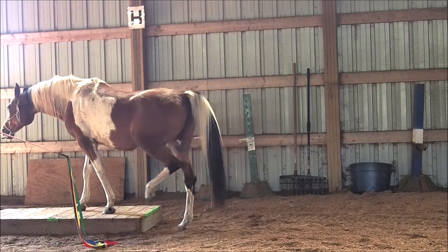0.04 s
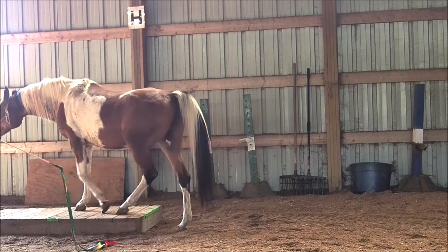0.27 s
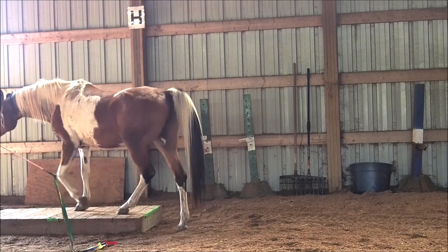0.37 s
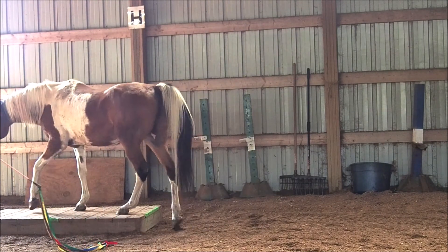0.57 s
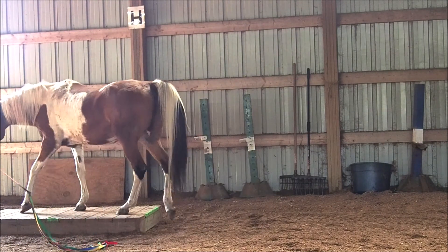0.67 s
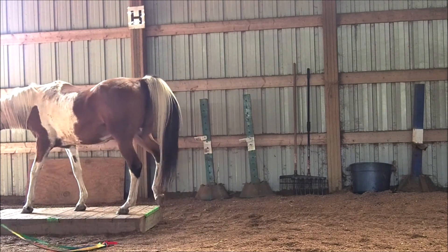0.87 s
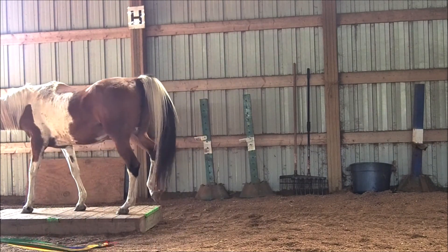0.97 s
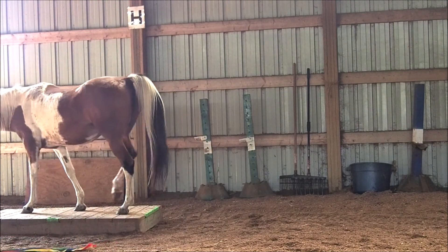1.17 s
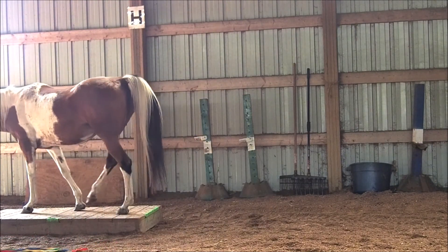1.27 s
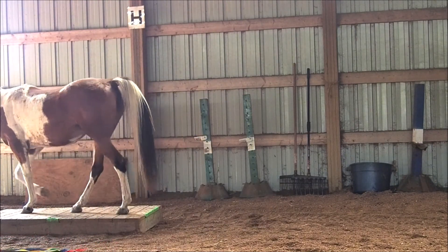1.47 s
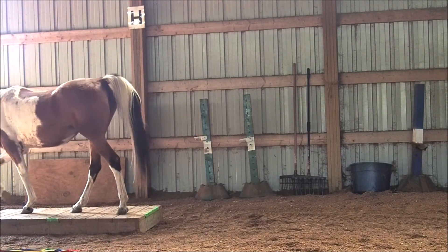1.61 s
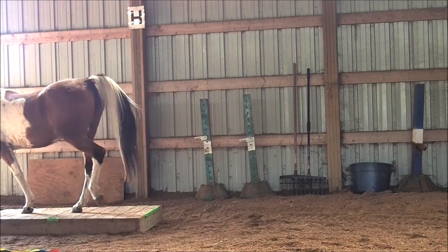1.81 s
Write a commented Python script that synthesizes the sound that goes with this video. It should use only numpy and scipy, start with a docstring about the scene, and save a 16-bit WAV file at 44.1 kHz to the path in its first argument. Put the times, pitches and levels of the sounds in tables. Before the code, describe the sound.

Hollow hoof steps on wooden boards, with soft sandy scuffs, echo in a big hall.

```python
"""A horse walks onto a low, hollow wooden platform in a large indoor riding arena, over steady rumble and
hiss. At 0.2 s a hoof lands toe first, then flat: the deck booms, boards clack, sand crunches, something
clinks faintly and the hall answers. A scuff leads to a softer step at 0.7 s and one faint, high chirp at
0.95 s. Hooves scuff again, grit snaps, a firm step lands at 1.4 s and a last scuff fades."""
import sys
import numpy as np
from scipy import signal
from scipy.fft import rfft, irfft
from scipy.io import wavfile
from scipy.ndimage import uniform_filter1d

SR = 44100
rng = np.random.default_rng(int(sys.argv[2]) if len(sys.argv) > 2 else 0)


def pcm_store(signal):
    """Save signal as 16-bit PCM."""
    levels = np.round(np.clip(np.atleast_2d(signal), -1, 1) * 32767)
    wavfile.write(sys.argv[1], SR, levels.astype(np.int16).T)


N = 81585
TIME_S = np.arange(N) / SR
BINS_HZ = np.fft.rfftfreq(N, 1 / SR)


def amp(db):
    """Decibels to gain."""
    return 10 ** (np.asarray(db) / 20)


def unit(x):
    """Scale to rms 1."""
    return x / np.sqrt(np.mean(x ** 2) + 1e-20)


def curve(points, hz=BINS_HZ):
    """Interpolate (Hz, value) rows over log frequency."""
    knots_hz, values = np.transpose(points)
    return np.interp(np.log(hz + 1), np.log(knots_hz + 1), values)


def add(mix, start_s, sound):
    """Mix a sound in at start_s."""
    part = mix[..., round(start_s * SR):][..., :sound.shape[-1]]
    part += sound[..., :part.shape[-1]]


def fade(age_s, t60_s):
    """Exponential decay, 60 dB down at t60_s."""
    return np.exp(-np.log(1000) * age_s / t60_s)


def low_cut(x, hz, order):
    """Butterworth high-pass."""
    return signal.sosfilt(signal.butter(order, hz, "high", fs=SR, output="sos"), x)


def tint(x, gain):
    """Filter by one gain per frequency bin."""
    return irfft(rfft(x) * gain, N)


def noise(gain=1, coherence=None):
    """Stereo noise, rms 1, of given spectrum and left-right coherence."""
    # Each row: frequency in Hz, coherence.
    default_coherence = [(30, 1), (500, 1), (1200, 1), (2500, 0.94), (5000, 0.95), (9000, 0.6)]
    left, independent = rfft(rng.standard_normal((2, N)))
    shared = curve(coherence or default_coherence)
    right = shared * left + np.sqrt(1 - shared ** 2) * independent
    return unit(irfft(np.array([left, right]) * gain, N))


def band(hz, width_hz):
    """Gaussian band of stereo noise."""
    return noise(np.exp(-.5 * ((BINS_HZ - hz) / width_hz) ** 2))


def background(flutter_hz=30, peak_s=.016):
    """Room air, microphone rumble and hiss; one high band flutters, mostly on the right."""
    # Each row: frequency in Hz, relative density in dB.
    air_spectrum = [(10, 3.5), (24, -2), (38, -4.5), (54, -17.5), (95, -18), (200, -21), (450, -20),
                    (850, -22), (1600, -25.5), (1950, -32.5), (3000, -34.5), (4100, -38.5), (5200, -25.5),
                    (6800, -28.5), (8000, -23), (9300, -30.5), (15500, -31.5)]
    # Each row: frequency in Hz, left-right coherence.
    air_coherence = [(30, 1), (800, 0.19), (2000, 0.094), (4000, 0.23), (9000, 0)]
    air = noise(amp(curve(air_spectrum)), air_coherence) * amp([[-56], [-54]])
    beat = .5 + .5 * np.cos(2 * np.pi * flutter_hz * (TIME_S - peak_s))
    flutter = beat ** 2 * band(hz=5820, width_hz=460) * amp([[-75], [-64]])
    return air + flutter


def diffuse_tail(gain=1, build_s=.0094):
    """Diffuse sound builds and dies away in the hall; bass lasts longest."""
    # Each row: frequency in Hz, T60 in seconds.
    hall_decay = [(80, 1.76), (175, 1.62), (270, 1.23), (380, 0.92), (560, 0.98), (1000, 1.03),
                  (2000, 0.93), (6000, 0.64), (14000, 0.13)]
    hz, frame_s, frames = signal.stft(tint(noise(), gain), SR, nperseg=1024)
    frames *= fade(frame_s, curve(hall_decay, hz)[:, None])
    tail = signal.istft(frames, SR, nperseg=1024)[1][:, :N]
    return tail * (1 - np.exp(-TIME_S / build_s))


def hall(x, wet_db=-5):
    """Hall reverberation of a small sound."""
    tail = diffuse_tail()
    response = amp(wet_db) * tail / np.linalg.norm(tail[0])
    return signal.fftconvolve(x, response, axes=1)[:, :N]


def chirp(start_s=.95, rise_s=.011):
    """One faint, high chirp, perhaps a bird in the rafters."""
    # Each row: centre in Hz, width in Hz, level in dB.
    bands = [(2250, 150, -67.5), (4570, 60, -61.5), (5150, 430, -58.5)]
    age = np.maximum(TIME_S - start_s, 0) / rise_s
    return age * np.exp(1 - age) * sum(amp(db) * band(hz, width_hz) for hz, width_hz, db in bands)


def clink(start_s=.232, width_hz=55):
    """Faint, narrow, high resonances ring out with the first step."""
    # Each row: frequency in Hz, relative level in dB, T60 in seconds.
    resonances = [(3040, -73.5, 0.67), (3565, -71, 0.58), (5480, -63, .4), (5720, -70, 0.35)]
    age_s = TIME_S - start_s
    ring = sum(amp(db) * fade(abs(age_s), t60_s) * band(hz, width_hz) for hz, db, t60_s in resonances)
    return (age_s > 0) * ring


def scuffs():
    """Hooves brush softly over sand and boards."""
    # Each row: start in seconds, length in seconds, peak level in dB.
    strokes = [(0.444, 0.11, -65.5), (1.027, 0.32, -67.5), (1.124, .12, -67), (1.214, 0.18, -77),
               (1.546, 0.31, -67)]
    # Each row: frequency in Hz, relative level in dB.
    scuff_spectrum = [(200, -2.5), (600, 4.5), (1500, 4.5), (2200, -1), (4000, -7), (5300, 9), (6800, 0.5),
                      (9000, -3), (15000, -36)]
    envelope = sum(amp(db) * np.sin(np.pi * np.clip((TIME_S - start_s) / length_s, 0, 1))
                   for start_s, length_s, db in strokes)
    return noise(amp(curve(scuff_spectrum))) * envelope


def grit(hz=5350, rise_s=.00036):
    """Single grains snap under a hoof in a few bright cycles, mostly on the right."""
    # Each row: start in seconds, relative level in dB.
    snaps = [(1.177, -49.5), (1.4194, -41), (1.421, -46.5), (1.4446, -55), (1.514, -51), (1.517, -50)]
    age_s = np.arange(0, .005, 1 / SR)
    snap = age_s / rise_s * np.exp(1 - age_s / rise_s) * np.sin(2 * np.pi * hz * age_s)
    out = np.zeros(N)
    for start_s, db in snaps:
        add(out, start_s, amp(db) * snap)
    return out * amp([[-11], [4]])


def hoof(wood_db, sand_db, contact_s=.0012, rattle_db=7, tail_db=-7, grain_depth=.3):
    """One contact rings the deck, rattles boards and crushes sand. Returns direct sound, hall tail."""
    # Centres in Hz of boom, body, knock, clack, crack.
    registers_hz = [115, 260, 490, 950, 1550]
    # Each row: frequency in Hz, relative level in dB, T60 in seconds.
    deck_modes = [(97.6, -3.5, 0.24), (132.5, -10.5, .35), (158, 1.5, 0.11), (184.6, -7.5, 0.067),
                  (213, 4.5, 0.087), (269.7, -7, 0.13), (371, -1.5, 0.27), (421, 2, 0.024),
                  (478.4, -5.5, .22), (521.5, -11, 0.24), (820, -15.5, 0.26), (871, -6, 0.32),
                  (1066, -27, 0.42), (1394, -26, 0.22)]
    # Three spectra. Each row: frequency in Hz, relative level in dB.
    board_spectrum = [(40, -73), (80, -10), (170, 4), (500, 6), (660, -4), (1000, 1.5), (1600, -4.5),
                      (1900, -18), (2400, -19), (2800, -70), (5000, -92)]
    sand_spectrum = [(1000, -6), (2300, -12), (2750, -14), (3050, -8), (3700, -14), (4200, -15.5),
                     (5400, -2.5), (6500, -6), (8000, -7), (10000, -21.5), (15000, -29)]
    hall_spectrum = [(60, -9), (115, 4), (175, 2.5), (260, -2.5), (400, 3), (900, -1.5), (2000, -3),
                     (6000, -10.5)]
    strike = list(zip(registers_hz, wood_db))
    ring = sum(amp(db + curve(strike, hz)) * fade(TIME_S, t60_s) * np.sin(2 * np.pi * hz * TIME_S)
               for hz, db, t60_s in deck_modes)
    wood_gain = unit(amp(curve(board_spectrum))) * amp(curve(strike))
    sand_gain = unit(amp(curve(sand_spectrum))) * amp(sand_db)
    rattle = amp(rattle_db) * tint(noise(), wood_gain) * fade(TIME_S, t60_s=.084)
    roughness = unit(uniform_filter1d(rng.standard_normal(N), size=40))
    grains = unit(np.exp(grain_depth * roughness))
    crunch = tint(noise(), sand_gain) * grains * fade(TIME_S, t60_s=.16)
    tail = diffuse_tail(np.hypot(wood_gain, sand_gain) * amp(tail_db + curve(hall_spectrum)))
    load = 1 - np.exp(-(TIME_S / contact_s) ** 2)  # the hoof comes to bear on the wood
    direct = load * (ring + rattle + crunch)
    return low_cut(direct, hz=103.5, order=3), tail  # the open-sided deck radiates little deep bass


def steps(spread_s=.002):
    """Each hoof contact arrives directly, off walls and roof, and as a diffuse tail."""
    # Each row: start in seconds, then relative dB of boom, body, knock, clack, crack, sand.
    contacts = [(0.2139, -28.5, -29.5, -51, -46, -51.5, -52.5), (0.2314, -41, -28.5, -35, -41, -44, -55),
                (.281, -61, -37.5, -41.5, -50, -62, -61), (.312, -40, -45, -45.5, -71, -80, -75),
                (.710, -43, -60, -67.5, -61, -63, -69), (.722, -49, -60, -51, -60, -67, -69),
                (0.761, -58, -68, -54, -65, -66, -78), (0.809, -51, -83, -65, -77, -74, -80),
                (1.427, -42, -49.5, -48, -41.5, -51.5, -65), (1.439, -35, -43, -45, -49.5, -47.5, -71),
                (1.4445, -55, -46.5, -32.5, -39.5, -45, -71), (1.467, -58, -48.5, -42.5, -49, -54.5, -79),
                (1.494, -60.5, -53, -47, -44.5, -56, -65)]
    # Each row: delay in seconds, gain in dB.
    reflections = [(.016, -7.5), (.027, -11.5), (.052, -14.5), (0.07, -13.5)]
    out = np.zeros((2, N))
    for start_s, *wood_db, sand_db in contacts:
        direct, tail = hoof(wood_db, sand_db)
        add(out, start_s, direct + tail)
        echo = low_cut(direct, hz=153, order=1)  # thin sheet walls let deep bass out
        for delay_s, db in reflections:
            jitter_s = spread_s * rng.uniform(-1, 1)  # paths change from spot to spot
            add(out, start_s + delay_s + jitter_s, amp(db) * echo)
    return out


def scene():
    """Steps, louder on the right, with the small sounds in the hall and the background."""
    soft = scuffs() + chirp()
    snaps = grit()
    platform = (steps() + clink()) * amp([[-.5], [3.4]])
    reverb = hall(soft + amp(-5) * snaps)
    return platform + soft + snaps + reverb + background()


def record(dry, cutoff_hz=15720):
    """Steep low-pass band limit."""
    taps = signal.firwin(511, cutoff_hz, window=("kaiser", 9), fs=SR)
    return signal.oaconvolve(dry, taps[None], "same")


dry = scene()
out = record(dry)
pcm_store(out)
```